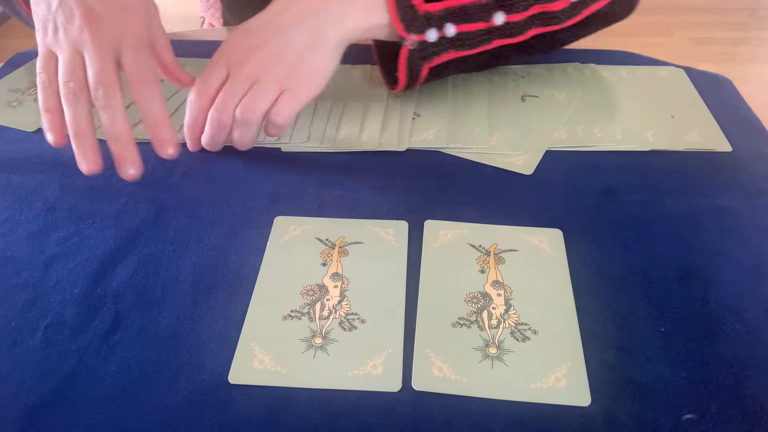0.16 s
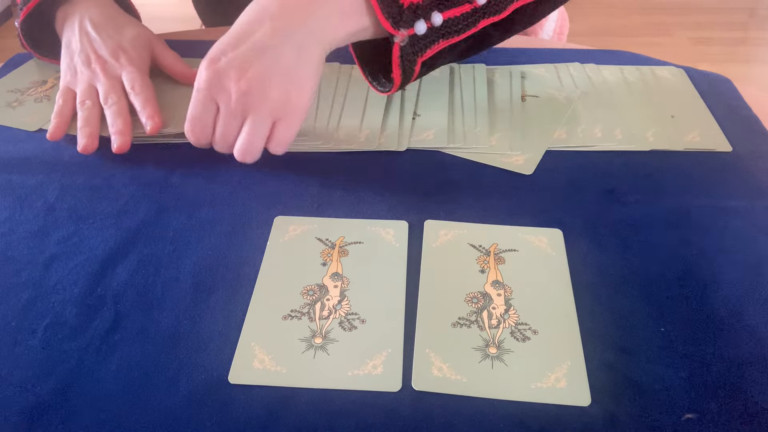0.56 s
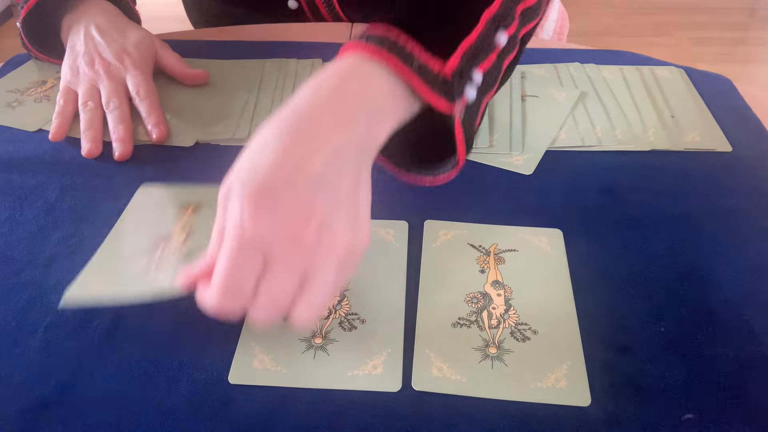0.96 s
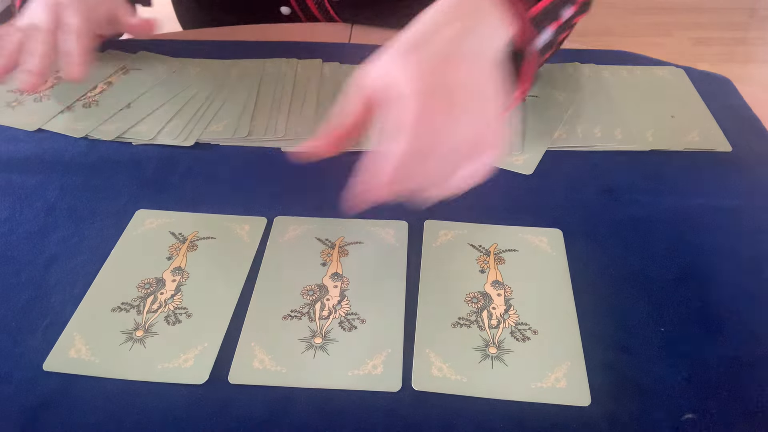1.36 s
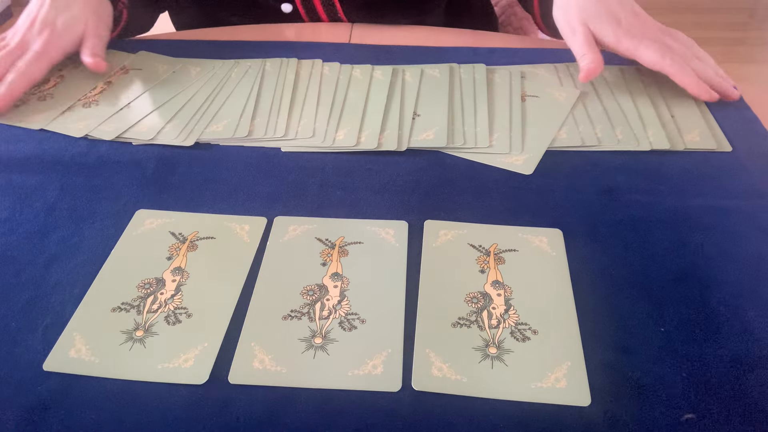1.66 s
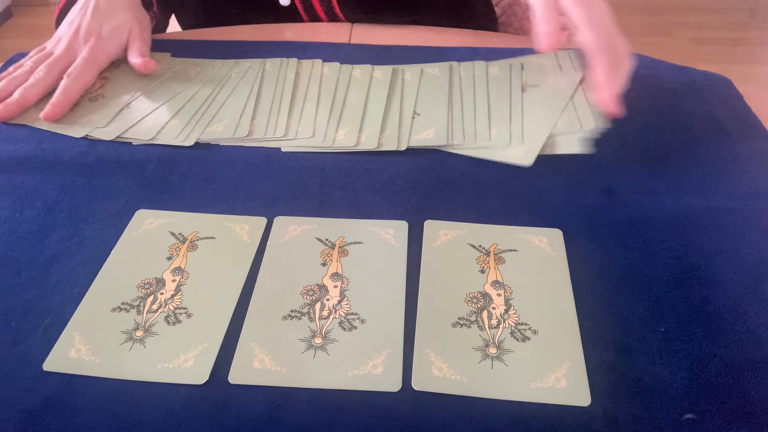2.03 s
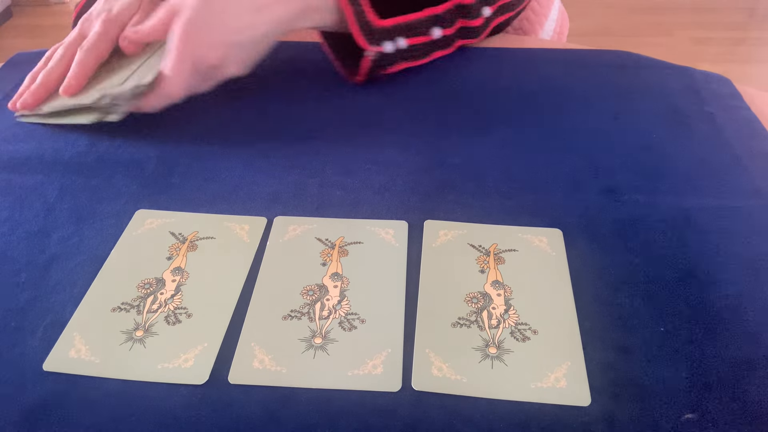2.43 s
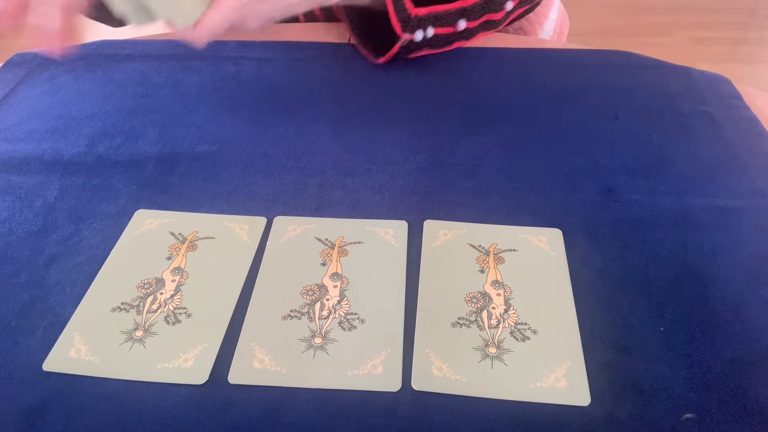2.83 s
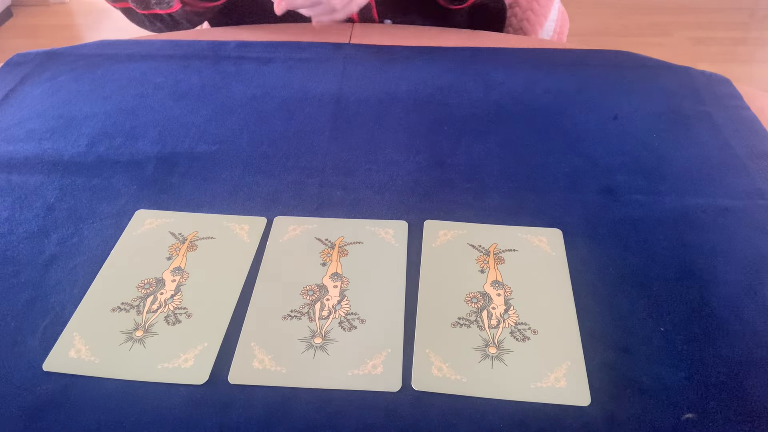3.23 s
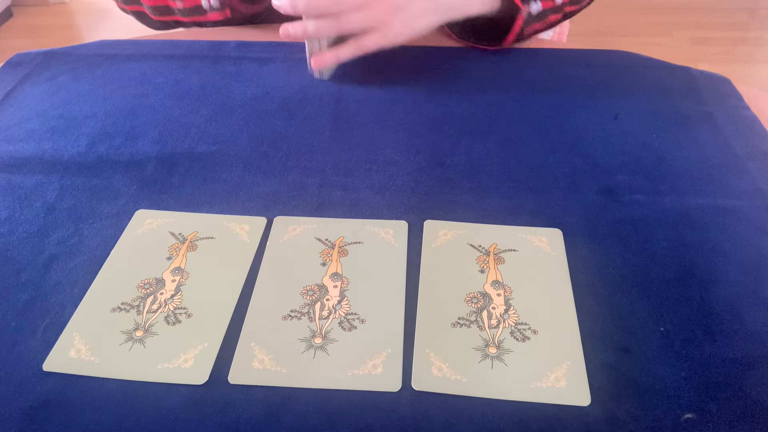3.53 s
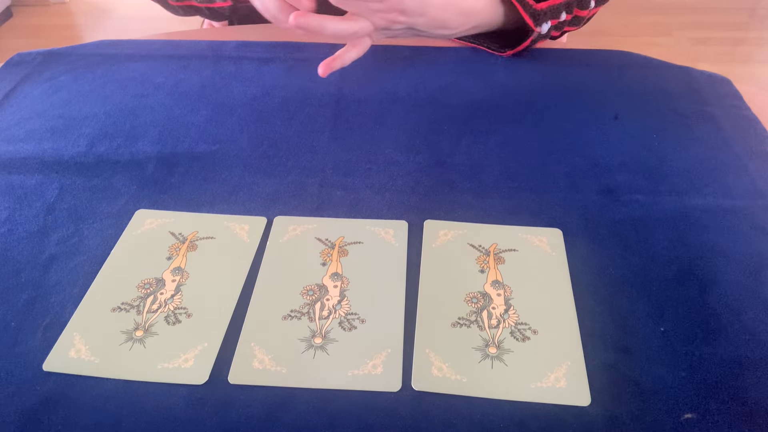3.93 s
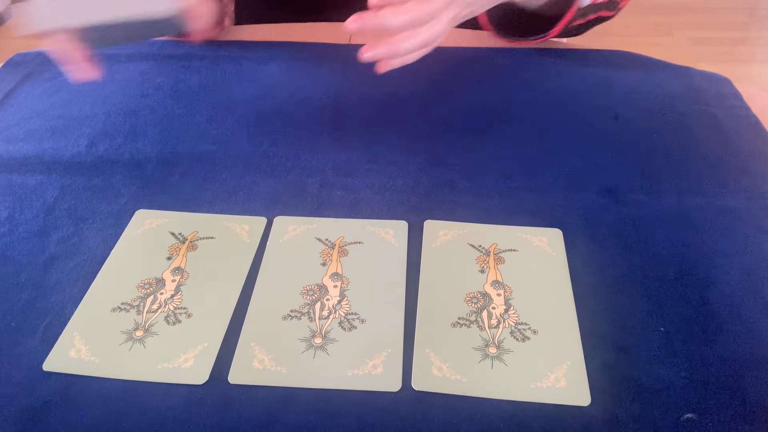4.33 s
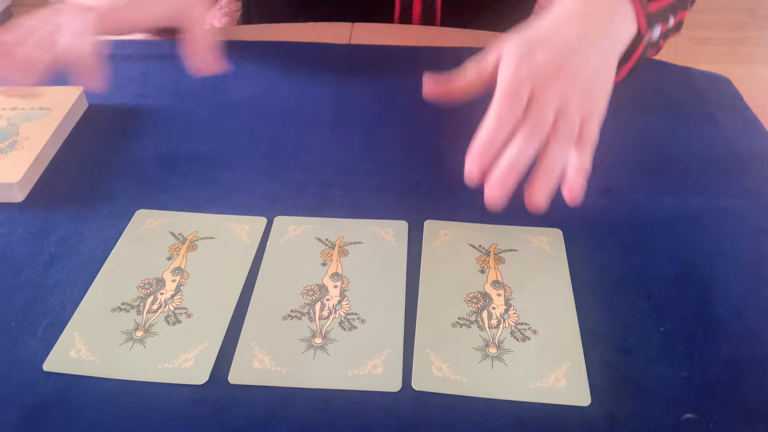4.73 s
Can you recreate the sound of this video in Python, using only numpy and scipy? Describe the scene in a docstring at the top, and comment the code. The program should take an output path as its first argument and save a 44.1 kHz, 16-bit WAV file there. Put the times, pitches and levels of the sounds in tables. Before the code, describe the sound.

Cards are handled close to the microphone on a cloth-covered wooden table. After a few light clicks, one card scrapes out of a spread and is snapped down sharply. The rest are swept up with a soft swish, the deck is knocked square in a quick cluster of taps, then set down with a duller knock. Hands brush faintly over the cloth, and a low hum fills the quiet room.

```python
"""Playing cards on a cloth-covered wooden table, in a quiet room with a low hum.
A card is slid out and snapped down, the spread is swept up, the deck is knocked square and set down.
Card edges click and crackle, blows ring the table modes, sliding cards and palms make friction noise.
Two close microphone ports share one treble, which reaches the right side a little later."""
import sys
import numpy as np
from scipy import signal
from scipy.fft import rfft, irfft, next_fast_len
from scipy.io import wavfile

SR = 44100
rng = np.random.default_rng(int(sys.argv[2]) if len(sys.argv) > 2 else 0)


def pcm_store(signal):
    """Save signal as 16-bit PCM."""
    levels = np.round(np.clip(np.atleast_2d(signal), -1, 1) * 32767)
    wavfile.write(sys.argv[1], SR, levels.astype(np.int16).T)


N = 290213

# card edge snaps: (time [s], level [dB], flex [Hz], decay [s], crack re flex [dB], crack [Hz],
# treble crackle [dB], Q [-])
EDGE_SNAPS = [(0.265, -53, 2040, 0.017, -23, 3200, -16, 10),
              (0.3, -47.5, 1790, 0.0024, -28, 4300, -26, 3.5),
              (0.4238, -32, 2100, 0.0063, -2, 4600, -7, 7.5),
              (.4265, -38, 1900, 0.0068, -3.5, 4650, -14, 7.1),
              (0.433, -29, 1777, 0.0024, -7, 4450, -0.5, 3.4),
              (0.4335, -24.5, 1450, 0.00052, 0, 8300, -14, 3.7),
              (.433, -27.5, 400, 0.0009, -15, 577, -40, 6.5),
              (0.439, -35.5, 1174, 0.011, -3, 4160, -5, 3.7), (0.6606, -39, 1807, 0.0003, 6.5, 3620, 3, 16),
              (0.6614, -45.5, 1200, 0.0019, 5, 2380, 5, 30), (0.66, -48, 4620, 0.0023, 3.5, 5460, 0, 11),
              (0.67, -43.5, 2367, 0.0023, -6, 3590, -10, 17),
              (0.9105, -35.5, 1150, 0.0041, 6, 3180, -9, 3.7),
              (0.9107, -43.5, 1900, 0.0042, 8, 5750, -10.5, 18),
              (0.918, -47, 909, 0.013, -9, 1800, -13, 3.3),
              (1.1529, -11, 7220, 0.00061, -12, 9300, -1, 5.7),
              (1.1535, -12.5, 2980, 0.00013, -0.5, 5510, -28.5, 3.84),
              (1.1537, -18, 794, 0.00011, -22, 2010, -25, 1.1),
              (1.656, -61, 1450, 0.0034, 2.5, 2690, -27, 2.6),
              (2.0792, -43.5, 1740, 0.0057, -10, 4630, -17, 2.8),
              (2.871, -52.5, 1300, 0.013, -34, 2970, -25, 2.6),
              (2.918, -48.5, 2170, 0.0012, -2.5, 3980, -14, 3),
              (2.962, -53, 2050, 0.0039, -6, 4000, -25, 6.2),
              (2.99, -46.5, 1952, 0.0011, 0, 3720, -25, 6.2), (3.058, -53.5, 3900, .006, -21, 9000, -21, 7),
              (3.065, -43, 4000, 0.008, -19.5, 9000, -16, 7),
              (3.077, -44.5, 3706, 0.011, -24, 9000, -11, 3.7),
              (3.219, -54, 2000, 0.0059, 7, 9000, -3.5, 6.4),
              (3.24, -54.5, 1587, 0.0063, -1, 2580, -23.5, 3),
              (3.576, -42, 1600, 0.004, -5.5, 2410, -19.5, 2.6),
              (3.58, -26.5, 1600, 0.021, -15, 2600, -18, 2.8),
              (3.593, -21, 1099, 0.0016, -12.5, 3270, -39, 2.4),
              (3.5983, -14.5, 1265, 0.0005, -13, 2030, -46.5, 7.5),
              (3.599, -29.5, 2560, 0.0031, -6, 3950, -31.5, 17),
              (4.028, -57.5, 1040, 0.0026, -11, 3950, 0.5, 2.4), (4.121, -67, 4650, 0.0074, 3, 8840, 1, 12),
              (4.137, -68, 4700, 0.02, -15, 8980, -8, 12),
              (4.582, -47.5, 1550, 0.021, -13, 3530, -6.5, 2.9),
              (4.5945, -34, 3350, 0.0011, -7, 5650, 5.5, 15), (4.607, -36, 884, 0.011, 4.5, 1910, -25, 2.1),
              (4.608, -43, 3300, 0.004, 2, 4530, -24, 3.7), (4.957, -58.5, 1860, 0.0044, 3, 4170, -25, 2.6),
              (5.083, -49, 2730, 0.008, -6, 4400, -9, 2.1), (5.21, -61, 1590, 0.0026, 3, 4200, -20, 3),
              (5.808, -58, 2400, 0.0035, -3, 8080, -5, 2.6),
              (6.0725, -47.5, 1050, 0.0006, 6, 3400, 19, 2.7),
              (6.0746, -52.5, 1490, 0.0015, 16.5, 3400, 10, 3.8)]
# blows on the table: (time [s], level [dB], contact hardness [Hz], place [0 far edge, 1 left side])
TABLE_KNOCKS = [(0.056, -41, 296, 0.33), (0.092, -49, 300, 0.34), (0.315, -39, 300, 1),
                (0.428, -29, 910, 1), (0.4334, -34.5, 1210, 0.31), (0.4351, -37, 710, 0.42),
                (.661, -50, 1506, 0.44), (0.911, -48, 1500, 0.59), (2.09, -52, 400, 0.39),
                (2.988, -45, 199, 0.68), (3.064, -52.5, 200, 0.95), (3.123, -51, 500, 0.56),
                (3.17, -46.5, 340, .5), (3.212, -42.5, 297.5, 0.55), (3.308, -53, 499.4, .5),
                (3.397, -50, 300, 0.66), (3.515, -58.5, 494, .5), (3.577, -26.5, 870, 0.12),
                (3.581, -23, 884, 0.11), (3.5925, -24, 1191, 0.17), (3.598, -24, 2500, 0.083),
                (3.604, -12.5, 117, 0.049), (4.028, -55.5, 1190, 0.44), (4.596, -24, 760, 0.92),
                (4.593, -31.5, 129.7, 0.29), (4.604, -37.5, 800, 0.98), (4.606, -29.5, 402, 0.39)]
# table and deck modes: (frequency [Hz], struck at far edge [dB], struck at left side [dB], t60 [s])
TABLE_MODES = [(72.6, -2.5, -4.5, 0.13), (91, -4.5, 1, 0.077), (120.6, -20.5, -2, 0.043),
               (158, -24, -5.5, 0.078), (243, 0, -4.5, 0.059), (346, -1, -9.5, 0.053),
               (397, -4.5, -7, 0.099), (456, -3, -9, 0.068), (608, -6, -3, 0.046),
               (630, -2.5, -10.5, 0.095), (750, -6, -6, 0.05), (863, -2.5, -8.5, 0.066),
               (1094, 2.5, -8.5, 0.028), (1340, 5, -12.5, 0.048), (1565, -8, -7, 0.033),
               (1910, -11.5, -10, 0.03), (2420, -3.5, -11.5, 0.018), (3200, -7, -18, 0.0087),
               (4060, -6.5, -13, 0.012)]
# hand position: (time [s], left minus right [dB], room send [dB])
HAND_PATH = [(.3, -3, -6.5), (.43, -0.5, -10), (.66, -0.5, -8), (.91, 2.5, -13.5), (1.15, 7, -9),
             (1.65, -6.5, -10.5), (2.08, -4.5, -1.5), (3.0, -3, -3), (3.23, 3.5, -8.5), (3.59, 3, -7),
             (4.1, -1, -10.5), (4.6, 2, -2), (4.95, -5, 2.5), (5.8, -5, -14), (6.07, -0.5, -9.5)]
# strokes over the cloth: (full speed at [s], rise [s], hold [s], fall [s], hiss [dB], scrape [dB],
# rasp [dB])
SLIDE_STROKES = [(0.17, 0.073, 0.0087, 0.084, -73.5, -74, -81), (0.257, 0.11, 0.024, .08, -82, -76, -64),
                 (0.422, 0.16, 0.011, .03, -69.5, -69, -72), (0.515, 0.073, 0.022, 0.15, -82, -64, -82),
                 (0.662, 0.027, 0.011, 0.04, -64, -55.5, -76),
                 (0.752, 0.032, 0.023, 0.083, -51, -45.5, -68),
                 (0.821, .008, 0.0067, 0.037, -56.5, -49.5, -67), (0.847, .008, .008, 0.035, -52, -52, -70),
                 (0.881, 0.036, 0.032, 0.016, -48.5, -50.5, -58), (0.93, 0.045, 0.012, 0.21, -65, -62, -64),
                 (1.152, 0.013, 0.0047, 0.054, -49, -59, -43),
                 (1.52, 0.092, 0.0093, 0.061, -74.5, -90.5, -79),
                 (1.806, 0.16, 0.045, 0.077, -70.5, -78, -76), (2.09, 0.15, 0.15, 0.4, -60, -68, -81),
                 (2.237, 0.08, 0.31, 0.046, -60.5, -67.5, -64.5),
                 (2.682, 0.39, 0.015, 0.19, -75.5, -77, -75), (2.93, 0.057, 0.12, .1, -67.5, -67, -81),
                 (3.054, 0.15, 0.038, 0.13, -57, -65, -65.5), (3.233, 0.035, 0.022, 0.084, -53, -61, -82),
                 (3.327, 0.037, 0.015, 0.086, -63.5, -72, -71.5),
                 (3.437, 0.081, 0.038, 0.045, -92, -96, -82.5),
                 (3.553, 0.041, 0.023, 0.022, -67, -85, -68.5),
                 (4.12, 0.0074, 0.035, 0.043, -72.5, -91, -73), (4.536, .02, 0.011, 0.022, -82, -95, -92),
                 (5.045, 0.13, 0.23, 0.13, -72.5, -71.5, -82), (5.448, 0.16, 0.098, 0.12, -75, -74, -93),
                 (6.087, 0.077, 0.17, 0.12, -76.5, -74, -96), (6.535, 0.13, 0.04, 0.061, -80.5, -74, -84)]
# narrow ringing tones in the scrape: (frequency [Hz], level [dB], t60 [s])
SCRAPE_TONES = [(1820, -11, .03), (2380, -1.5, .03), (3250, 2.5, 0.068), (3650, -3.5, 0.021),
                (4100, -2.5, 0.029), (4606, 0, 0.057)]
# slow background of arms and table: (time [s], rumble [dB], rasp [dB])
ARM_MOTION = [(0, -52, -74), (.13, -49, -68.5), (.24, -56, -70), (.32, -46.5, -83), (.6, -58.5, -76),
              (.8, -67, -67), (1.1, -70.5, -82), (1.34, -53.5, -72.5), (1.6, -70.5, -81.5),
              (1.95, -65.5, -76.5), (2.14, -47.5, -76), (2.42, -62.5, -67.5), (2.8, -59.5, -82),
              (3.16, -51, -77), (3.3, -57, -73), (3.45, -55.5, -85), (3.95, -57.5, -90), (4.25, -64.5, -95),
              (4.5, -69.5, -90), (4.85, -52.5, -77.5), (5.3, -55.5, -88), (5.85, -55, -77.5),
              (6.1, -56, -73), (6.58, -58.5, -97.5)]
# palms on deck or cloth: (centre [s], 1/e half width [s], level [dB])
PALM_RUBS = [(0.14, 0.15, -62), (2.12, 0.035, -58), (3.144, 0.035, -58.5), (3.437, 0.052, -62.5),
             (5.4, 0.1, -71)]
# noise spectra: (frequency [Hz], relative density [dB])
EDGE_SCRAPE = [(1200, -30.5), (2400, -4.5), (3700, 1.5), (4700, 1), (5800, -9), (7000, -4), (12000, -32.5)]
SURFACE_HISS = [(2000, -32.5), (4500, -7.5), (7000, -1), (9000, 1.5), (12000, -2), (14000, -2.5),
                (16000, -1.5)]
BODY_RASP = [(400, -31), (900, -7.5), (1700, -5.5), (2400, -8), (3500, -14), (6000, -38)]
TABLE_RUMBLE = [(60, 6), (150, 8.5), (400, -4), (800, -15), (1500, -22.5), (3000, -65.5)]
PALM_HOLLOW = [(150, -17), (350, 9), (850, -1), (1100, -38), (2500, -44)]
ECHO_SPECTRUM = [(100, -2), (400, -1.5), (1500, -2.5), (2800, -2.5), (4000, -6), (5500, -5.5), (8000, -4),
                 (15000, -5)]
AIR_SPECTRUM = [(20, -4.5), (50, 3), (100, -4.5), (170, 1.5), (260, -10), (450, -16.5), (700, -41),
                (1400, -32), (2200, -43.5), (3200, -39), (5000, -44), (10000, -43), (16000, -48)]
# room decay: (frequency [Hz], t60 [s])
ROOM_DECAY = [(60, 0.18), (200, 0.27), (500, 0.49), (1100, 0.56), (3000, 0.47), (8000, 0.3), (16000, 0.18)]
# hum lines: (frequency [Hz], rms level [dB], width [Hz])
HUM_LINES = [(46.4, -62, 3.6), (159, -73.5, 9.6), (398, -77.5, 6), (604, -81, 2.4), (1425, -87.5, 18),
             (3240, -95, 140)]
# diffuse field: (frequency [Hz], left-right coherence [0-1])
COHERENCE = [(60, 0.99), (300, 0.85), (640, 0.086), (1400, 0.042), (5000, 0.029)]
# port imbalance: (frequency [Hz], right minus left [dB])
PORT_BALANCE = [(100, -0.85), (500, 0.6), (1300, 3.5), (3000, 3.5), (5000, 5), (7000, 1.5)]
# right port lag: (frequency [Hz], phase [turns])
PORT_LAG = [(0, 0), (2200, .08), (4000, .03), (5000, .22), (6000, .36), (6600, .56), (7500, .76),
            (9000, 1.02), (13000, 1.82), (17000, 2.6)]

STROKE_FADE_DB, SCRAPE_RING_DB, HISS_TRIM_DB = 20, -12.5, 2
FIRST_ECHO_S, ROOM_RING_RATIO = .006, 0.38   # ratio: ring time towards the room / heard close
AIR_DB, DRONE_HZ, DRONE_DB = -56.5, 197.8, -59.5
SHARED_FROM_HZ, CUTOFF_HZ = 5800, 15700


def card_snaps():
    """A click and dying crackle drive flex and crack resonances. Row 0: close; rows 1-3: to the room."""
    size = 2048
    out, t = np.zeros((4, N)), np.arange(size) / SR
    treble_band = signal.butter(1, [5500, 12000], "band", fs=SR)
    for k, snap in enumerate(EDGE_SNAPS):
        time_s, level_db, flex_hz, decay_s, crack_db, crack_hz, treble_db, close_q = snap
        burst = min(decay_s * 300, .8) * rng.standard_normal(size) * np.exp(-t / decay_s)
        burst[0] = 1   # short snaps are nearly this click alone
        crackle = amp(treble_db) * signal.lfilter(*treble_band, burst)
        lowpass = signal.butter(4, min(1.35 * crack_hz, 18000), fs=SR)
        start, direction = round(time_s * SR), 1 + k % 3
        for row, q in ((0, close_q), (direction, close_q * ROOM_RING_RATIO)):
            body = resonance(burst, flex_hz, q) - amp(crack_db) * resonance(burst, crack_hz, q)
            out[row, start:start + size] += amp(level_db) * (signal.lfilter(*lowpass, body) + crackle)
    return out


def table_knocks():
    """A soft contact pulse rings the modes, weighted by place. Row 0: close; row 1: to the room."""
    out, size = np.zeros((2, N)), 12000
    click = signal.unit_impulse(size) + 1e-18
    for time_s, level_db, contact_hz, place in TABLE_KNOCKS:
        r = np.exp(-2 * np.pi * contact_hz / SR)
        push = signal.lfilter([(1 - r) ** 2], [1, -2 * r, r * r], click)
        start = round(time_s * SR)
        for k, (hz, far_db, left_db, t60_s) in enumerate(TABLE_MODES):
            gain = amp(level_db + (1 - place) * far_db + place * left_db) * (-1) ** k
            out[0, start:start + size] += gain * ring(push, hz, t60_s)
            out[1, start:start + size] += gain * ring(push, hz, t60_s * ROOM_RING_RATIO)
    return signal.lfilter(*signal.butter(2, 60, "high", fs=SR), out)   # cut sub-bass below 60 Hz


def stroke_gains():
    """Strokes swell, hold, fade and add in power. Returns hiss, scrape and rasp gains."""
    t, power = np.arange(0, N, 44) / SR, 1e-14
    for time_s, rise_s, hold_s, fall_s, *levels_db in SLIDE_STROKES:
        early = np.maximum(time_s - t, 0) / rise_s
        late = np.maximum(t - time_s - hold_s, 0) / fall_s
        power = power + amp(np.array(levels_db)[:, None] - STROKE_FADE_DB * (early + late)) ** 2
    return [np.interp(np.arange(N) / SR, t, np.sqrt(p)) for p in power]


def card_slides():
    """Dense, clumped slips: edge scrape, body rasp and surface hiss over table rumble."""
    rumble_db, rasp_db = per_sample(ARM_MOTION)
    hiss_gain, scrape_gain, rasp_gain = stroke_gains()
    clumps = amp(1.5 * drift(33))
    slips = rng.standard_normal((2, N))
    slips *= amp(2 * np.minimum(rng.exponential(1, N), 6))   # some slips stand out
    rumble = amp(rumble_db + 2.1 * drift(12.3)) * stereo_noise(TABLE_RUMBLE, near=0.053)
    rasp = np.hypot(rasp_gain, amp(rasp_db)) * stereo_noise(BODY_RASP, near=0.077, source=slips)
    scrape_ring = unit_rms(sum(amp(db) * ring(slips, hz, t60_s) for hz, db, t60_s in SCRAPE_TONES))
    edge = stereo_noise(EDGE_SCRAPE, near=0.052, source=slips)
    scrape = scrape_gain * amp(0.75 * drift(70)) * (edge + amp(SCRAPE_RING_DB) * scrape_ring)
    hiss = hiss_gain * amp(HISS_TRIM_DB) * stereo_noise(SURFACE_HISS, near=0.16)
    return rumble + clumps * (scrape + rasp + hiss)


def palm_rubs():
    """Rubbing palms: hollow low noise that swells and fades."""
    t = np.arange(N) / SR
    swell = sum(amp(db) * np.exp(-((t - centre_s) / half_s) ** 2) for centre_s, half_s, db in PALM_RUBS)
    return swell * amp(1.3 * drift(40)) * stereo_noise(PALM_HOLLOW, near=.3)


def room_echoes(x):
    """Noise tail that swells at the first reflection; the mids last longest."""
    size = 30000
    t, tail = np.arange(size) / SR, np.zeros((2, size))
    noise = stereo_noise(ECHO_SPECTRUM, near=.01)[:, :size]
    octaves_hz = 40 * 2 ** np.arange(10)
    for k, (low_hz, high_hz) in enumerate(zip(octaves_hz, octaves_hz[1:])):
        band = signal.sosfilt(signal.butter(2, [low_hz, high_hz], "band", fs=SR, output="sos"), noise)
        t60_s = at_hz(ROOM_DECAY, np.sqrt(low_hz * high_hz))
        tail += (-1) ** k * band * amp(-60 * t / t60_s)
    tail *= np.clip((t - FIRST_ECHO_S) / .003, .1, 1) * (t > .002)
    tail /= np.sqrt(np.sum(tail ** 2) / 2)
    return signal.fftconvolve(x[None], tail, axes=1)[:, :N]


def room_tone():
    """Air noise and hum: one firm tone plus wavering narrow noise lines."""
    out = amp(AIR_DB + drift(3.4)) * stereo_noise(AIR_SPECTRUM, near=.01)
    turns = np.cumsum(DRONE_HZ + 1.5 * drift(4.4)) / SR
    out += amp(DRONE_DB + 0.74 * drift(8.1)) * np.sqrt(2) * np.sin(2 * np.pi * turns)
    for hz, level_db, width_hz in HUM_LINES:
        out += amp(level_db) * unit_rms(ring(rng.standard_normal(N), hz, t60_s=2.2 / width_hz))
    return out


def resonance(x, hz, q):
    """Band-pass of width hz / q, output scaled to peak 1."""
    r = np.exp(-np.pi * hz / q / SR)
    y = signal.lfilter([1, 0, -1], [1, -2 * r * np.cos(2 * np.pi * hz / SR), r * r], x)
    return y / np.abs(y).max()


def ring(x, hz, t60_s):
    """One resonator: a unit click gives a decaying unit sine."""
    r, w = amp(-60 / (t60_s * SR)), 2 * np.pi * hz / SR
    return signal.lfilter([0, np.sin(w)], [1, -2 * r * np.cos(w), r * r], x)


def stereo_noise(spectrum, near, source=None):
    """Shaped unit-rms noise; near: 0 diffuse, 1 mono."""
    if source is None:
        source = rng.standard_normal((2, N))
    size = next_fast_len(N)
    hz = np.arange(size // 2 + 1) * SR / size
    mid, side = rfft(source, size) * amp(at_hz(spectrum, hz))
    coherence = near + (1 - near) * at_hz(COHERENCE, hz)
    stereo = np.sqrt(1 + coherence) * mid + np.sqrt(1 - coherence) * side * [[1], [-1]]
    return unit_rms(irfft(stereo, size)[:, :N])


def drift(rate_hz):
    """Slow random wander, rms 1."""
    control_hz = 400
    knots = rng.standard_normal(int(N / SR * control_hz) + 2)
    r = np.exp(-2 * np.pi * rate_hz / control_hz)
    slow = unit_rms(signal.lfilter([1], [1, -2 * r, r * r], knots))
    return np.interp(np.arange(N) / SR * control_hz, np.arange(len(slow)), slow)


def per_sample(rows):
    """Interpolate each column over time."""
    time_s, *columns = np.transpose(rows)
    return [np.interp(np.arange(N) / SR, time_s, column) for column in columns]


def at_hz(rows, hz):
    """Interpolate over log frequency."""
    knots_hz, values = np.transpose(rows)
    return np.interp(np.log(np.maximum(hz, 1)), np.log(knots_hz), values)


def amp(db):
    """Decibels to gain."""
    return 10 ** (np.asarray(db) / 20)


def unit_rms(x):
    """Scale to rms 1."""
    return x / np.sqrt(np.mean(x ** 2) + 1e-30)


def scene():
    """Snaps and knocks, each direction with its own echoes, over friction noise and room tone."""
    pan_db, send_db = per_sample(HAND_PATH)
    snaps, *snap_sends = card_snaps()
    knocks, knock_send = table_knocks()
    echoes = sum(room_echoes(amp(send_db) * send) for send in snap_sends)
    echoes += room_echoes(amp(send_db + 5) * knock_send)
    panned_snaps = snaps * amp(pan_db * [[.5], [-.5]])
    return panned_snaps + knocks + echoes + card_slides() + palm_rubs() + room_tone()


def record(dry):
    """Two ports: shared treble, lagging on the right; lows trail highs; both band ends cut."""
    size = next_fast_len(N + 4096)
    hz = np.arange(size // 2 + 1) * SR / size
    left, right = rfft(dry, size)
    shared = 0.82 / (1 + (SHARED_FROM_HZ / np.maximum(hz, 1)) ** 14)
    lag = np.exp(-2j * np.pi * np.interp(hz, *np.transpose(PORT_LAG)))
    right = ((1 - shared) * right + shared * left) * lag
    lift = amp(.5 * at_hz(PORT_BALANCE, hz))
    delay, pole = np.exp(-2j * np.pi * hz / SR), .3
    allpass = (delay - pole) / (1 - pole * delay)
    dispersion = (allpass / delay) ** 22
    out = irfft(np.array([left / lift, right * lift]) * dispersion, size)[:, :N]
    out = signal.sosfilt(signal.butter(2, 35, "high", fs=SR, output="sos"), out)
    return signal.sosfilt(signal.cheby2(14, 60, CUTOFF_HZ * 1.02, fs=SR, output="sos"), out)


dry = scene()
out = record(dry)
pcm_store(out)
```